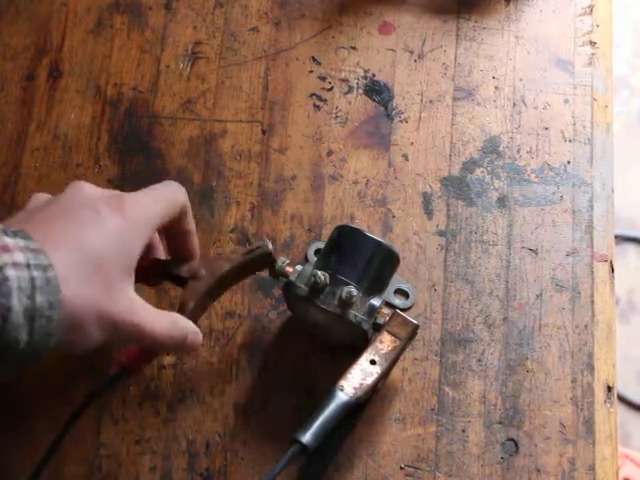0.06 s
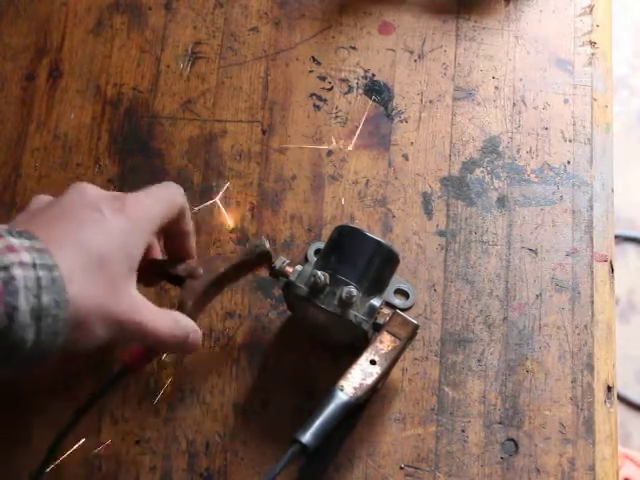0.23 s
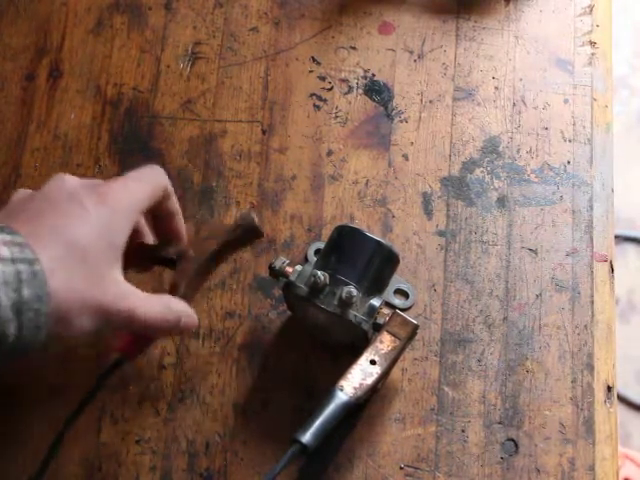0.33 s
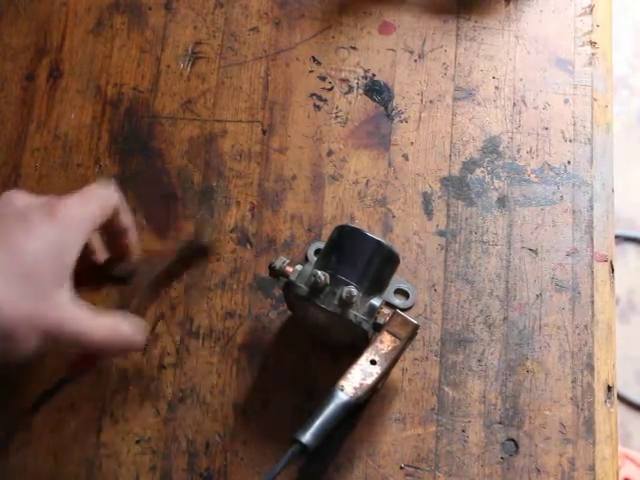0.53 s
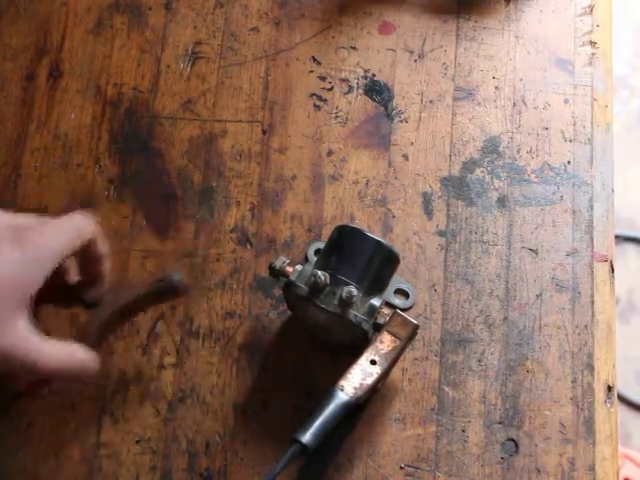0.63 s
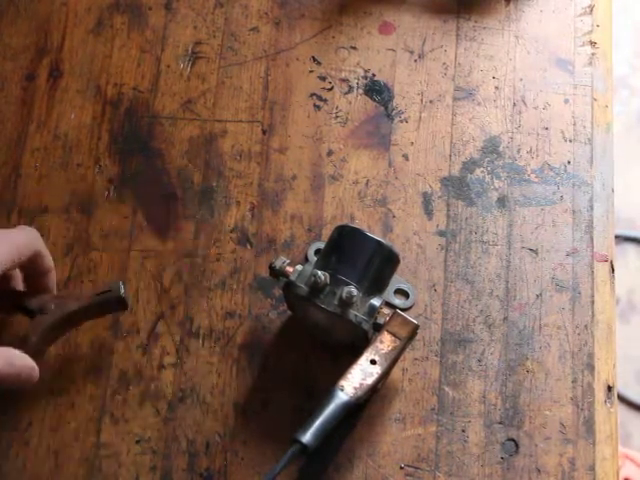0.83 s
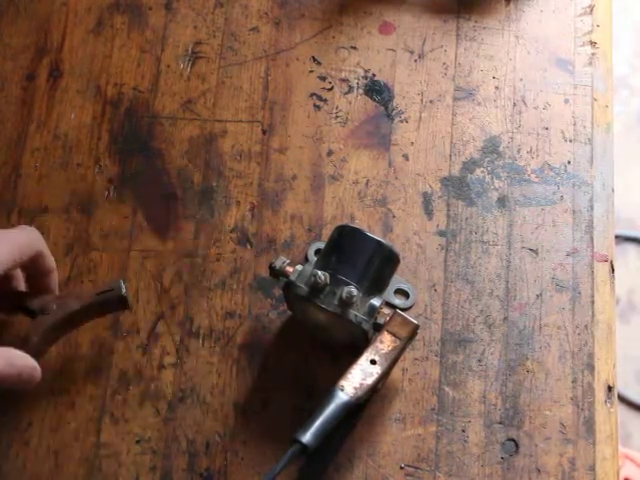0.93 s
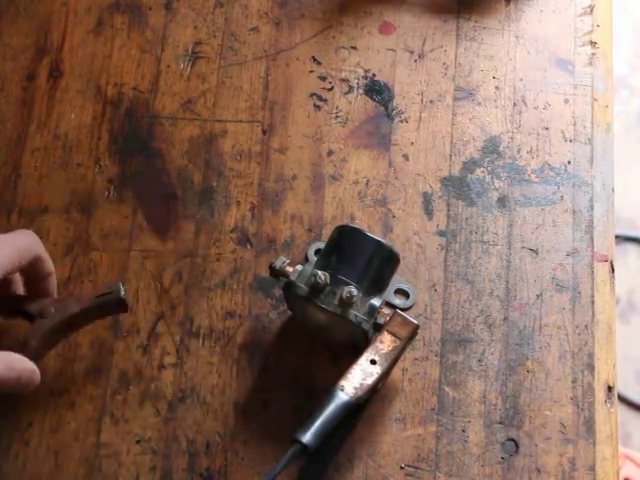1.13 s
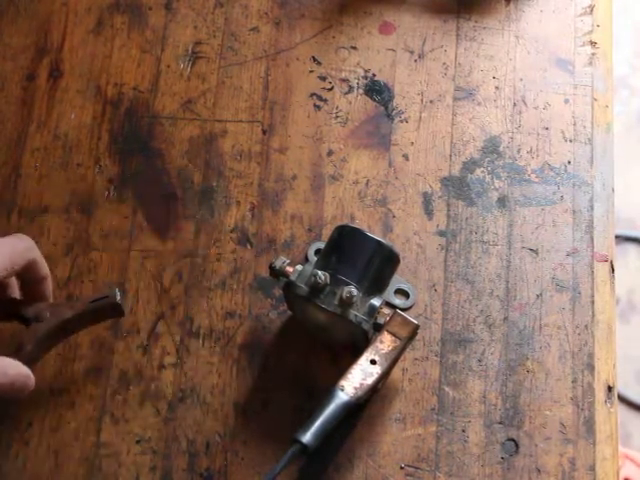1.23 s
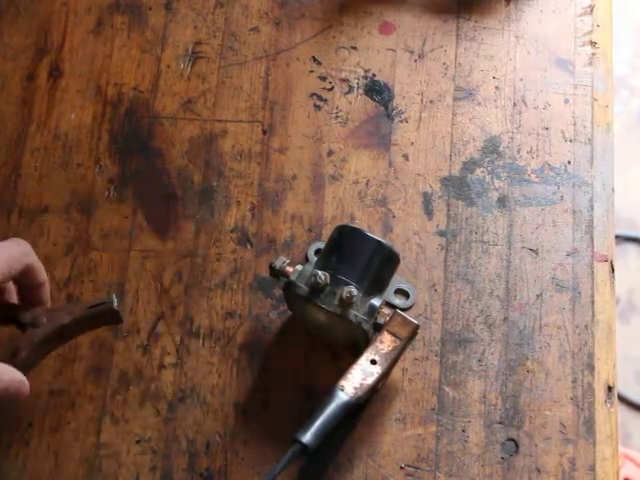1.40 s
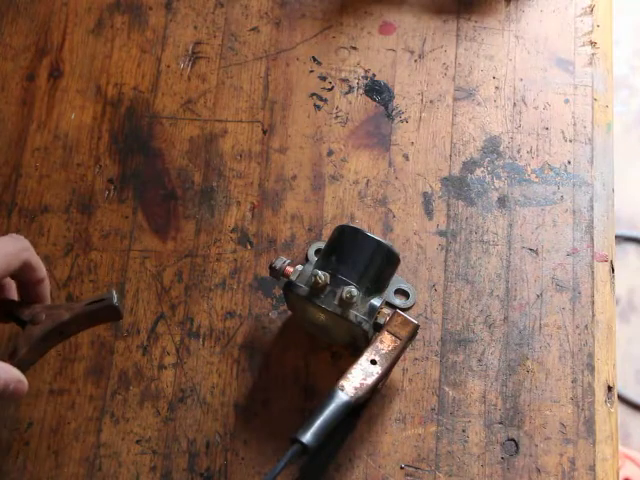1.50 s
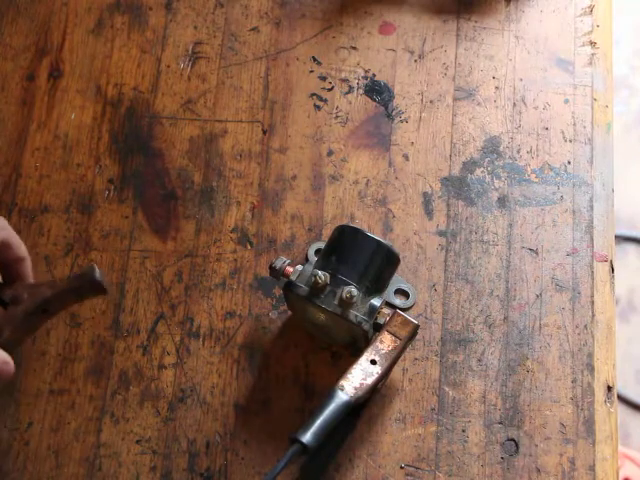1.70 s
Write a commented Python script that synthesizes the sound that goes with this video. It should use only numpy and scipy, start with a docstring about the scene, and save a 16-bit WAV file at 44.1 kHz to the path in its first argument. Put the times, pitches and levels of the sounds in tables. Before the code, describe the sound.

A sharp electrical snap dominates: at about 0.23 seconds a spark cracks, abrupt, bright and clipped, with a slight low thump, brief metallic ringing and a dense short room tail, thickened by faint late echoes near 0.29 and 0.41. Before and after, quiet hiss, cloth rustle and tiny ticks, rustling most around 1.0. At 1.57 a soft, dull wooden knock, then small ticks. Close stereo, indoor workshop.

```python
"""Over the quiet hiss of a workshop, cloth rustles and a charger clamp ticks as it brushes a terminal.
A spark snaps: a burst of noise with a dense short tail, a low thump and the ringing modes of the metal.
Two late echoes follow as coloured noise swells, then the hand draws the clamp back with rustles and ticks.
Near the end the clamp knocks on the wooden bench: damped sines that sag in pitch, under a thud of noise.
The loud snap overloads the stereo input, which clips it and passes nothing above its band limit."""
import sys
import numpy as np
from scipy import signal
from scipy.fft import rfft, irfft, next_fast_len
from scipy.io import wavfile
from scipy.ndimage import map_coordinates

SR = 44100
rng = np.random.default_rng(int(sys.argv[2]) if len(sys.argv) > 2 else 0)


def bounce(signal):
    """Save signal as a 16-bit WAV file at the path given by the first command-line argument."""
    frames = np.transpose(np.atleast_2d(signal))
    limited = np.clip(frames, -1, 1)
    pcm = np.round(limited * 32767).astype(np.int16)
    wavfile.write(sys.argv[1], SR, pcm)


N = 77175
T = np.arange(N) / SR  # time, s

SPARK_START_S, SPARK_GAIN_DB, SPARK_PAN_DB = .2272, 2.8, -.5  # pan: left minus right
GRAIN_KNOTS_PER_S, GRAIN_SCATTER_DB = 2000, 3.5  # density and size scatter of the arrivals
THUMP_GAIN_DB, THUMP_TIME_S = -20, .002
# Spectrum of the snap [hz, density_db_per_hz]
SPARK_SPECTRUM = [(20, -40), (100, -20), (250, -16), (500, -9), (790, -4), (1080, -5), (1500, -9),
                  (1900, -3), (2400, -6), (2750, -3), (3300, -8), (4000, -4), (5000, -12), (6200, -8),
                  (7500, -13), (9000, -26), (11800, -16), (15400, -26)]
# Left-right correlation of the snap and its echoes [hz, correlation]
SPARK_CORRELATION = [(60, .99), (300, .97), (950, .8), (3800, .7), (8000, .4), (15000, 0)]
# Reverberation time of the workshop [hz, t60_s]
ROOM_DECAY = [(60, .07), (300, .11), (1000, .13), (3000, .125), (6000, .115), (14000, .1)]
# Late echoes of the snap [start_s, level_db, rise_s, t60_s, dull_above_hz]
LATE_ECHOES = [(.288, -19.5, .02, .19, 16000), (.4065, -34.5, .005, .24, 12000)]
# Spectrum of the echoes [hz, density_db_per_hz]
ECHO_SPECTRUM = [(120, -42), (200, -14), (780, -4), (1170, 0), (1350, -8), (1600, -2), (2250, -4),
                 (2700, -4), (3200, 0), (3500, -5), (4000, -18), (5200, -15), (6100, -10), (6800, -13),
                 (7300, -21), (8300, -17), (12000, -24), (15400, -34)]
# Modes of the clamp and terminal [pitch_hz, level_db, t60_s]
METAL_MODES = [(791, -14, .16), (1080, -15, .16), (1347, -11, .16), (1794, -15, .15), (1844, -16, .15),
               (1985, -16, .15), (2080, -17, .15), (2654, -14, .14), (2769, -14, .14), (3130, -19, .17),
               (3410, -18, .14), (4050, -13, .1), (6045, -20, .13)]

KNOCK_START_S, RING_GAIN_DB, THUD_GAIN_DB, THUD_T60_S = 1.5712, -37, -25.5, .2
SAG_FRACTION, SAG_TIME_S = .28, .022  # the ring starts this much sharp and settles
# Modes of the wooden bench [pitch_hz, relative_level_db, t60_s]
BENCH_MODES = [(258, 2, .25), (430, -1, .12), (650, 0, .12), (960, -2, .1), (1200, -2, .08),
               (1600, -6, .08)]
# Spectrum of the thud [hz, density_db_per_hz]
THUD_SPECTRUM = [(60, -50), (150, -19), (300, -4), (500, -2), (1130, -3), (1500, -7), (2370, -9),
                 (2900, -18), (6000, -32), (12000, -48)]

TICK_RISE_S, TICK_CORRELATION = .001, .7
# Handling ticks and scuffs [start_s, level_db, centre_hz, width_hz, t60_s]
CONTACTS = [(.042, -48, 6000, 6000, .03), (.072, -44, 1300, 900, .07), (.21, -36, 500, 600, .4),
            (.412, -45, 6000, 1200, .1), (.445, -39, 1600, 700, .12), (.475, -43, 900, 900, .5),
            (.613, -43, 2300, 3500, .15), (.656, -43, 1500, 1000, .2), (.73, -40, 1460, 900, .15),
            (.733, -43, 600, 400, .12), (.84, -45, 600, 900, .25), (.953, -44, 2300, 900, .1),
            (1.027, -43, 1200, 1300, .3), (1.159, -40, 800, 1500, .03), (1.305, -42.5, 1200, 900, .35),
            (1.328, -47, 4200, 2000, .04), (1.3785, -38, 1650, 800, .25), (1.381, -49, 7000, 7000, .08),
            (1.445, -55, 9500, 3000, .05), (1.5455, -40, 5000, 2500, .035), (1.632, -46, 5800, 1500, .02),
            (1.695, -35, 800, 1500, .06), (1.74, -47, 8300, 5000, .04)]

# Level of the moving sleeve and cable [time_s, level_db]
RUSTLE_LEVEL = [(0, -48), (.08, -47), (.14, -51), (.2, -55), (.46, -60), (.6, -55), (.72, -55), (.8, -49),
                (.85, -46), (.89, -46.5), (.96, -43.5), (1.06, -45.5), (1.1, -50), (1.3, -50), (1.4, -49.5),
                (1.52, -52), (1.6, -46), (1.66, -51), (1.75, -51)]
# Spectrum of the rubbing [hz, density_db_per_hz]
CLOTH_SPECTRUM = [(120, -40), (300, -12), (600, -6), (1400, -5), (2200, -4), (3300, -7), (4200, -5),
                  (5000, -8), (8000, -14), (15400, -27)]

HISS_LEVEL_DB, BACKGROUND_PAN_DB = -45.7, -1  # pan: left minus right
# Spectrum of the room tone [hz, density_db_per_hz]
HISS_SPECTRUM = [(20, -47), (45, -30), (65, -14), (190, -3), (280, -2), (370, -4), (670, 0), (850, -2),
                 (1080, -1), (1250, -3), (1420, 0), (1700, -7), (2500, -10), (3900, -13), (4200, -10),
                 (4500, -14), (8000, -18), (15400, -28)]
# Left-right correlation of the hiss and the rustle [hz, correlation]
HISS_CORRELATION = [(60, 0.96), (240, 0.35), (950, 0.39), (3770, 0.02), (15000, -0.11)]

CLIP_CEILING, CLIP_HARDNESS = .97, 6
BAND_LIMIT_HZ = 15900


def amp(db):
    """Decibel law: 20 dB is a factor of ten in amplitude."""
    return 10 ** (np.asarray(db) / 20)


def unit(x):
    """Normalization: scale to an rms of 1."""
    return x / np.sqrt(np.mean(x ** 2) + 1e-20)


def along(points, hz):
    """Logarithmic frequency scale: interpolate (hz, value) points along it."""
    point_hz, value = np.transpose(points)
    return np.interp(np.log(hz + 1), np.log(point_hz + 1), value)


def spectrum_gain(points):
    """Spectral envelope: a gain that follows dB points over frequency."""
    return lambda hz: amp(along(points, hz))


def filtered(x, response):
    """Linear filtering: multiply the spectrum of x by a response."""
    size = next_fast_len(x.shape[-1] + 8192)
    spectrum = rfft(x, size) * response(np.fft.rfftfreq(size, 1 / SR))
    return irfft(spectrum, size)[..., :x.shape[-1]]


def stereo_noise(gain, correlation, size=N, grain=1):
    """Partial coherence: the balance of mid and side noise sets the left-right correlation; rms is 1."""
    def mid_side_gain(hz):
        angle = np.arccos(np.clip(along(correlation, hz), -1, 1)) / 2
        return gain(hz) * [np.cos(angle), np.sin(angle)]

    mid, side = filtered(grain * rng.standard_normal((2, size)), mid_side_gain)
    return unit(np.array([mid + side, mid - side]))


def burst(start_s, rise_s, t60_s, t=T):
    """Exponential decay: a rise from zero, then 60 dB lost per t60."""
    age = np.maximum(t - start_s, 0)
    return (1 - np.exp(-age / rise_s)) * amp(-60 * age / t60_s)


def wobble(rate):
    """Band-limited fluctuation: a smooth curve through random knots, rate of them a second."""
    knots = rng.standard_normal(int(N * rate / SR) + 4)
    return map_coordinates(knots, [T * rate])


def pan(db):
    """Interchannel level difference: half the dB to each side."""
    return amp([[db / 2], [-db / 2]])


def snap_tail():
    """Frequency-dependent absorption: each band of the abrupt noise dies at its own t60."""
    grain = amp(GRAIN_SCATTER_DB * wobble(GRAIN_KNOTS_PER_S))
    arrivals = stereo_noise(spectrum_gain(SPARK_SPECTRUM), SPARK_CORRELATION, grain=grain)
    hz, frame_s, bands = signal.stft(arrivals, SR, nperseg=256)
    frame_age = np.maximum(frame_s - SPARK_START_S, 0)
    decay = amp(-60 * frame_age / along(ROOM_DECAY, hz)[:, None])
    tail = signal.istft(bands * decay, SR, nperseg=256)[1][:, :N]
    return amp(SPARK_GAIN_DB) * tail * (T >= SPARK_START_S)


def low_thump():
    """Damped bass pulse: a brief low thump, alike in both channels, swings once to the opposite sign."""
    age = np.maximum(T - SPARK_START_S, 0) / THUMP_TIME_S
    return amp(THUMP_GAIN_DB) * np.e * age * np.exp(-age) * (1 - age / 4)


def late_echoes():
    """Late reflection: each echo is a decaying burst of coloured, dulled noise."""
    out = np.zeros((2, N))
    for start_s, level_db, rise_s, t60_s, dull_hz in LATE_ECHOES:
        dulled = lambda hz: amp(along(ECHO_SPECTRUM, hz)) / (1 + (hz / dull_hz) ** 4)
        out += amp(level_db) * burst(start_s, rise_s, t60_s) * stereo_noise(dulled, SPARK_CORRELATION)
    return out


def spark():
    """Impulsive source in a room: the snap and its tail, the low thump and the late echoes add up."""
    return pan(SPARK_PAN_DB) * (snap_tail() + low_thump() + late_echoes())


def metal():
    """Modal vibration: jolted metal rings in damped sines, nearly in phase at both microphones."""
    age = np.maximum(T - SPARK_START_S, 0)
    common_phase = rng.uniform(0, 2 * np.pi, (len(METAL_MODES), 1, 1))
    phases = common_phase + rng.normal(0, .4, (len(METAL_MODES), 2, 1))
    out = np.zeros((2, N))
    for (pitch_hz, level_db, t60_s), phase in zip(METAL_MODES, phases):
        envelope = amp(level_db) * burst(SPARK_START_S, .002, t60_s)
        out += envelope * np.sin(2 * np.pi * pitch_hz * age + phase)
    return out


def knock():
    """Struck wood: bench modes sag in pitch as they decay, under a noisy thud."""
    age = np.maximum(T - KNOCK_START_S, 0)
    # integral of the pitch ratio 1 + SAG_FRACTION * exp(-age / SAG_TIME_S)
    warped_age = age + SAG_FRACTION * SAG_TIME_S * (1 - np.exp(-age / SAG_TIME_S))
    ring = np.zeros(N)
    for pitch_hz, level_db, t60_s in BENCH_MODES:
        envelope = amp(level_db) * burst(KNOCK_START_S, .001, t60_s)
        ring += envelope * np.sin(2 * np.pi * pitch_hz * warped_age)
    noise = stereo_noise(spectrum_gain(THUD_SPECTRUM), [(1000, .8)])
    thud = burst(KNOCK_START_S, .003, THUD_T60_S) * noise
    return amp(RING_GAIN_DB) * ring + amp(THUD_GAIN_DB) * thud


def ticks():
    """Resonant contact noise: each small contact is a puff of noise in one broad resonance."""
    size = SR // 3  # longest puff, samples
    out = np.zeros((2, N + SR))
    for start_s, level_db, centre_hz, width_hz, t60_s in CONTACTS:
        def resonance(hz):
            damping = (hz * width_hz) ** 2
            return damping / ((centre_hz ** 2 - hz ** 2) ** 2 + damping)

        puff = stereo_noise(resonance, [(1000, TICK_CORRELATION)], size=size)
        envelope = amp(level_db) * burst(0, TICK_RISE_S, t60_s, T[:size])
        first = round(start_s * SR)
        out[:, first:first + size] += envelope * puff
    return out[:, :N]


def rustle():
    """Friction noise: the rubbing of cloth and cable is grainy noise of varying level."""
    time_s, level_db = np.transpose(RUSTLE_LEVEL)
    grain = amp(1.5 * wobble(600))
    cloth = stereo_noise(spectrum_gain(CLOTH_SPECTRUM), HISS_CORRELATION, grain=grain)
    return amp(np.interp(T, time_s, level_db) + .8 * wobble(25)) * cloth


def hiss():
    """Ambient noise: coloured room tone whose level wavers slightly."""
    noise = stereo_noise(spectrum_gain(HISS_SPECTRUM), HISS_CORRELATION)
    return amp(HISS_LEVEL_DB + .8 * wobble(8)) * noise


def scene():
    """Superposition: the signals of all sources add."""
    handling = knock() + ticks() + rustle()
    return spark() + metal() + pan(BACKGROUND_PAN_DB) * (handling + hiss())


def record(dry):
    """Saturation and band limiting: peaks bend towards a ceiling, then the top band is removed."""
    overload = np.abs(dry / CLIP_CEILING) ** CLIP_HARDNESS
    clipped = dry / (1 + overload) ** (1 / CLIP_HARDNESS)
    # the gain falls to zero over the last 300 Hz below the limit
    return filtered(clipped, lambda hz: np.clip((BAND_LIMIT_HZ - hz) / 300, 0, 1))


dry = scene()
out = record(dry)
bounce(out)
```